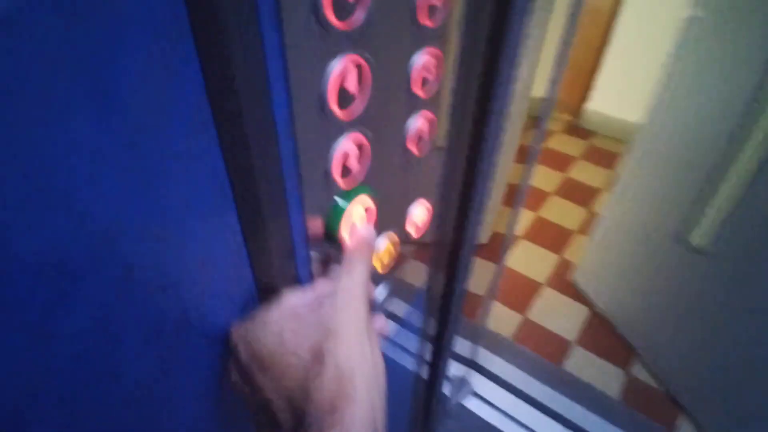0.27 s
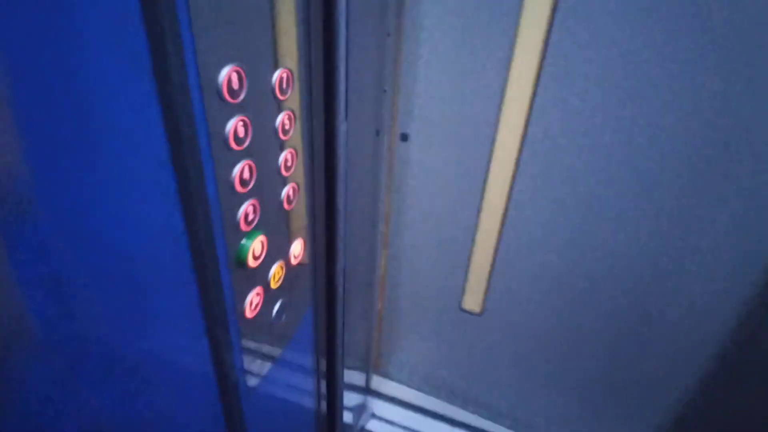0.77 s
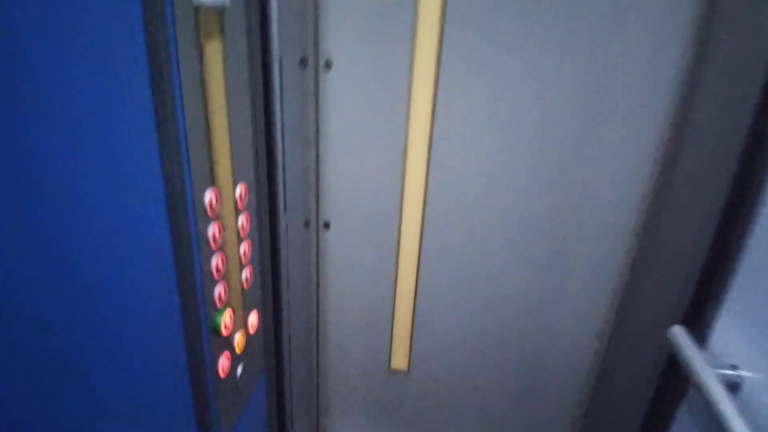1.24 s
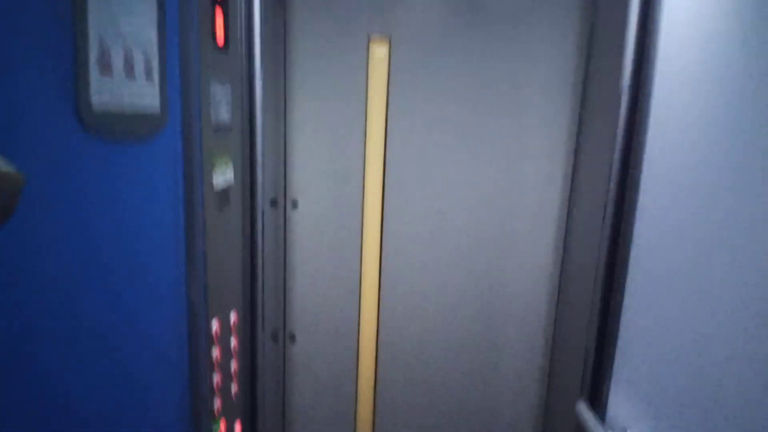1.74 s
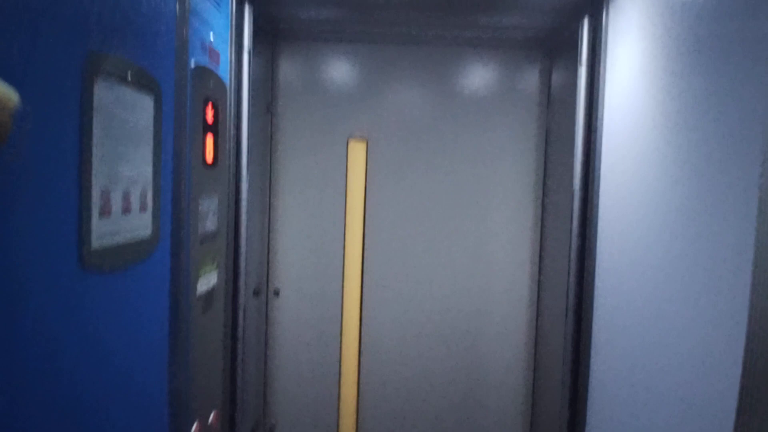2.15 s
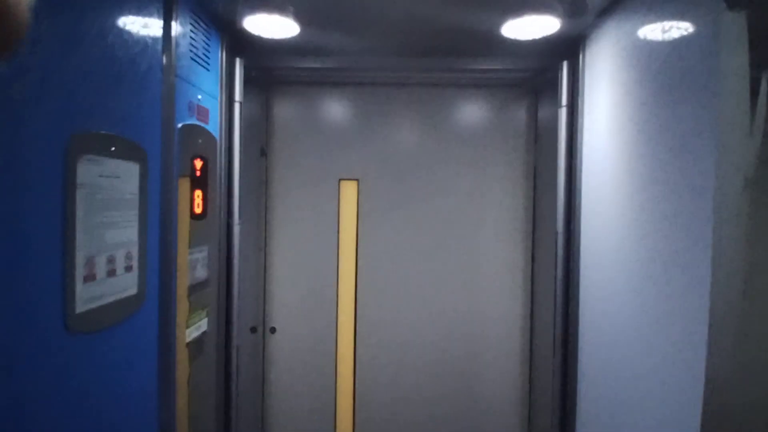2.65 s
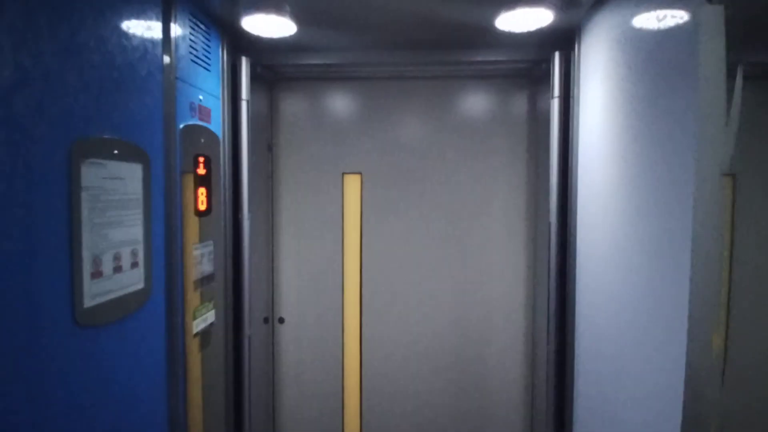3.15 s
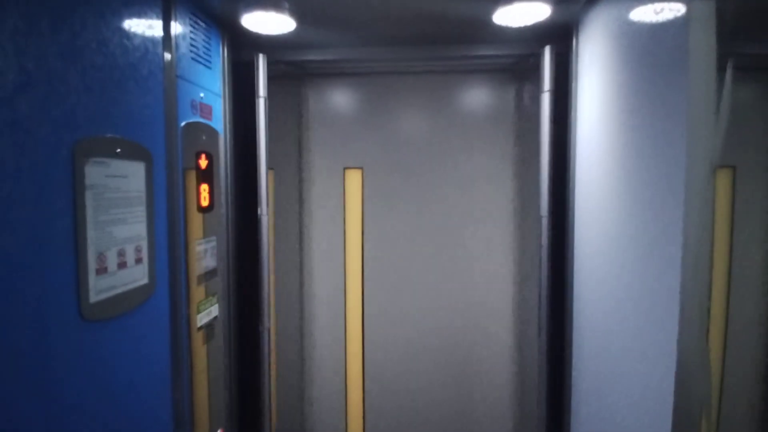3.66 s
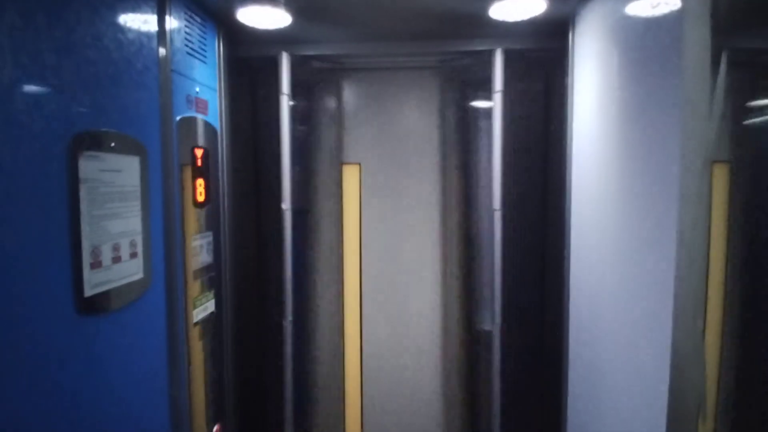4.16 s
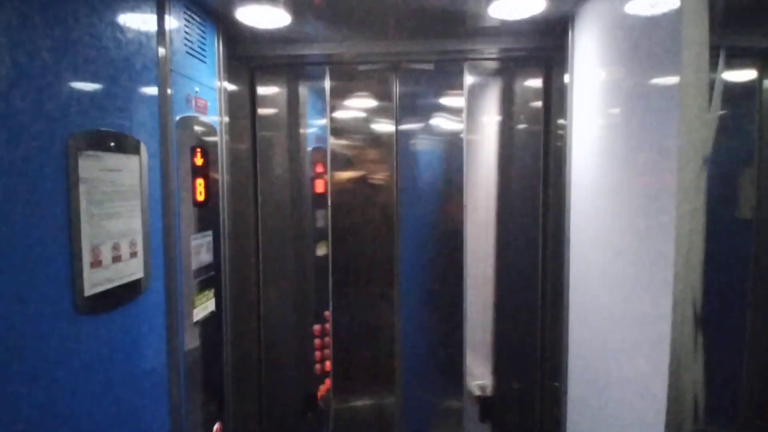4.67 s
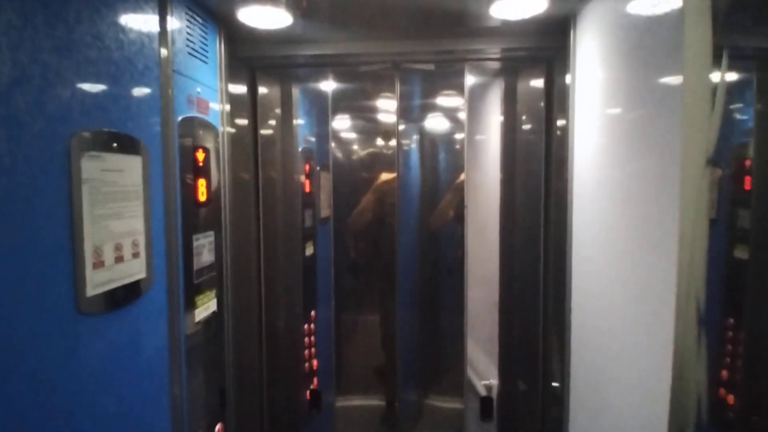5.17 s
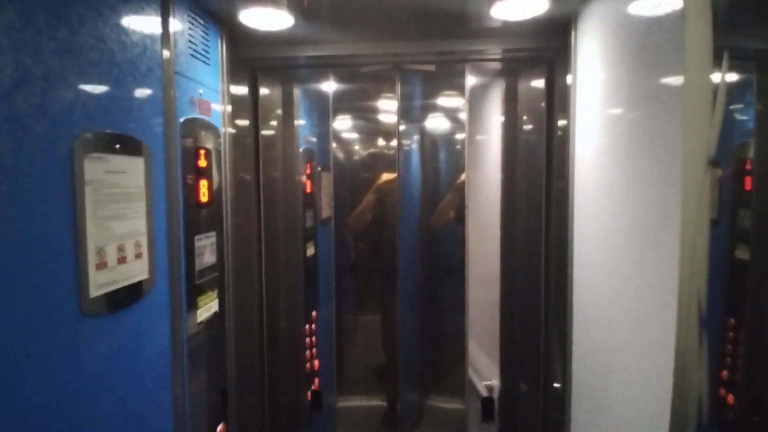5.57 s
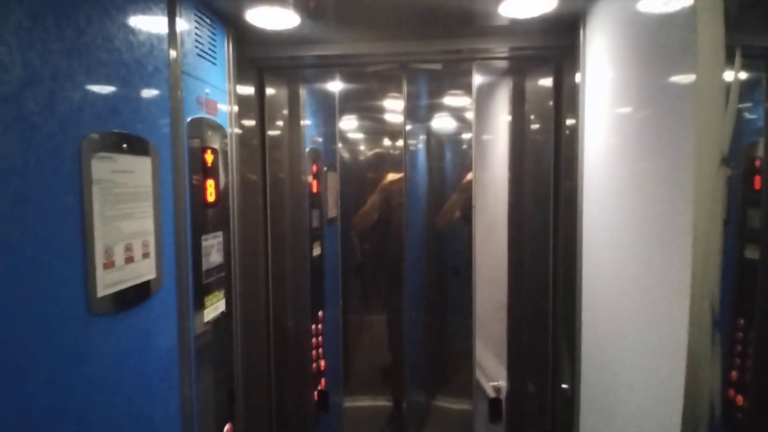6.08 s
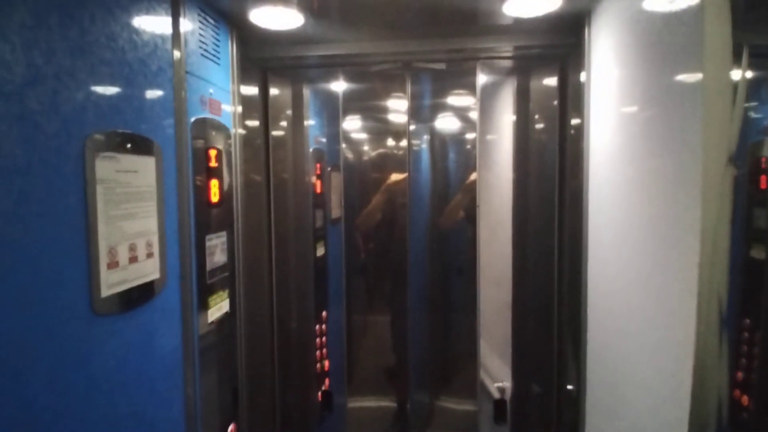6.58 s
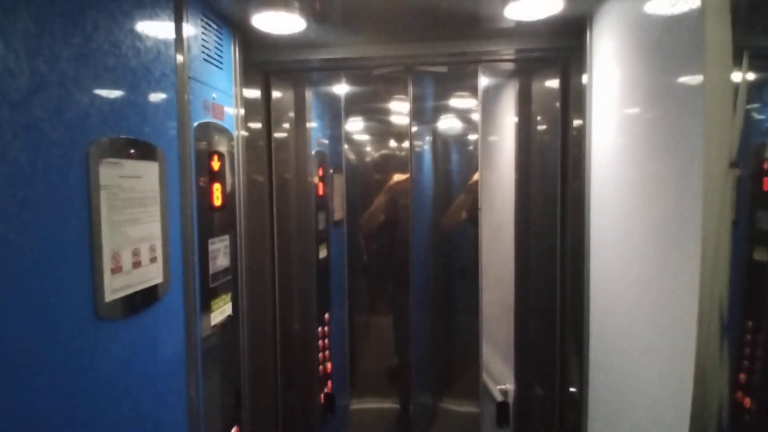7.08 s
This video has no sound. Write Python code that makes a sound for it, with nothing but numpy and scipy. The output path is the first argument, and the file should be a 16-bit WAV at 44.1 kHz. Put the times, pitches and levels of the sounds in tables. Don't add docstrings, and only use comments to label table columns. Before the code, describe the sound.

Heard from inside a cramped metal lift car: faint button and hand noises, then a heavy hinged door slams with a boom, bounces, rattles and squeaks briefly. After a lull a latch clicks, folding doors rumble and clatter shut, and small clicks and scrapes follow. Finally a relay snaps, the car thuds and a low hum begins. Close handheld stereo pickup with tight metallic reflections.

```python
import sys
import numpy as np
from scipy import signal
from scipy.fft import rfft, irfft, next_fast_len
from scipy.io import wavfile
from scipy.ndimage import uniform_filter1d

SR = 44100
rng = np.random.default_rng(int(sys.argv[2]) if len(sys.argv) > 2 else 0)


def undo_db(level):
    steps = np.asarray(level, float) / 20
    return 10 ** steps


def int16_out(signal):
    q = np.round(np.clip(np.atleast_2d(signal).T, -1, 1) * 32767)
    wavfile.write(sys.argv[1], SR, q.astype(np.int16))


N = 322941
TIME = np.arange(N) / SR
COARSE = TIME[::SR // 1000]

# frequency in Hz, width in Hz, level in dB.
SWAY_MODES = [(33.7, 16.3, 3.5), (54, 16, 3.5)]
FRAME_MODES = [(81.5, 7.6, -4), (99.3, 7.2, -1), (109.6, 4.8, -0.5), (145.6, 16.8, -2.5)]
PANEL_MODES = [(185, 19, 6), (211, 16, -13.5), (235.8, 7.1, -4), (262, 15, 2.5), (307, 70, 2.5)]
SHEET_MODES = [(365.8, 21.7, 4.5), (431.2, 22.6, 2), (501, 72, 2), (650, 71, -2), (712.7, 28, -1.5),
               (801, 52, 0), (907, 135, -1.5), (1124, 360, -2.5)]
# start in seconds, level in dB, place (0 car, 1 frame, 2 panels,
# 3 sheets), hold in seconds, T60 in seconds.
LANDING_DOOR = [(0.17, -40, 0.54, .02, 0.36), (0.366, -32, 2.26, .02, 0.81), (.37, -39.5, 0.11, .1, 1.1),
                (.829, -16.5, 2.8, 0.072, 0.83), (.83, -32, 1.4, .06, .3), (0.854, -16, .05, .03, 0.4),
                (0.915, -16.5, 2.18, 0.058, 1.5), (1.027, -16, 2.3, 0.18, 1.5),
                (1.068, -13, 0.038, 0.063, 0.87), (1.278, -19.5, 2.38, 0.067, 1.43),
                (1.348, -15, .05, 0.039, 0.7), (1.583, -13, 0.29, 0.062, 1.35),
                (1.652, -25.5, 2.35, 0.055, 1.2), (1.918, -24.5, 0.27, 0.033, 2.5),
                (2.188, -36.5, 2.47, 0.053, 1.6), (.01, -49, 2, 0.24, 0.54)]
CAR_DOORS = [(2.5, -39, -0.44, 0.6, .6), (2.615, -36, 2.5, 0.043, .5), (2.81, -44, 0, 0.043, .3),
             (2.859, -27, 0.93, .05, 1.2), (2.87, -31, 3.1, 0.027, 0.42), (3.189, -18.5, 1.32, .06, 0.56),
             (3.2, -30.5, 2.7, 0.18, 1.4), (3.4, -19.5, 0.76, 1.35, .5), (3.41, -33, 2, 1.2, 0.24),
             (3.52, -19.5, 0.95, 0.12, 0.8), (3.7, -29, 1.5, 0.058, 0.3), (3.88, -27, 2.17, 0.061, 0.84),
             (3.96, -24, -1, 0.045, 0.34), (4.24, -19, 2.4, 0.036, 0.43), (4.478, -20, 2.5, 0.028, 0.43),
             (4.56, -17, 1.2, 0.066, 0.37), (3.07, -30, 1.56, 0.14, .3), (4.12, -22.5, 2.5, 0.068, 0.82),
             (4.719, -23, 2, 0.065, 0.61), (4.96, -24, 2, 0.085, 0.24), (5.0, -30, 0.3, 0.24, 1.2),
             (3.71, -34, 3, .72, .3)]
DRIVE = [(5.372, -28, 2.1, 0.022, 0.61), (5.5, -41.5, 2.66, .25, .6), (6.8, -39, 1.5, 0.068, .4),
         (5.9, -54.5, .05, .1, .5), (6.2, -47, 0.06, 0.11, 1.1), (6.349, -29.5, 1.25, 0.026, 1.3),
         (6.67, -28, 0.26, 0.083, 1.45), (6.8, -25, 0.063, .55, .5), (6.9, -30, 2.26, 0.034, 0.18),
         (6.93, -36, 2, 0.011, 0.39), (6.97, -16, 0.63, 0.017, 0.44), (7.0, -35.5, 2.45, .4, .5)]
# start in seconds, level in dB, hold and T60 in seconds.
MOTORS = [
    (4.747, -30.5, .8, 1.3),
    (5.904, -45.5, .25, .5),
    (6.906, -25, .45, .5),
]
REST_DB = [-48, -66, -56, -56.5]
SHOVE_RISE_S = [0.027, 0.012, 0.014, 0.0038]
LOSS_DB_PER_PART = 11.5
PANEL_QUIET_HZ, PANEL_HZ_PER_DB = 179, 2.5

# time in seconds, frequency
# in Hz, level in dB.
BOOM = [(.824, 204.5, -49), (0.833, 205.5, -9), (0.871, 212.8, -14), (0.902, 227, -8.5), (.96, 253.7, -11),
        (1.015, 262, -13), (1.04, 262, -28)]
# time in seconds, level in dB.
BOUNCES = [(.834, 2), (0.844, 0), (.864, -3), (.889, 4), (.92, 2), (.939, 1), (0.965, 1.5), (0.979, -1),
           (1.001, 0), (1.016, -6), (1.033, -7)]
BOUNCE_S, BETWEEN_DB = 0.0065, -14

# frequency in Hz, level in dB, T60 in seconds.
SLAM_MODES = [(136.5, -3.5, 0.43), (872, -6.5, 0.051)]
STRIKE_MODES = [(1770, -5, 0.22), (1920, -4, .25), (2060, -3, 0.29), (2260, -1, .2)]
LATCH_MODES = [(833, 1, 0.36), (890, 7.5, 0.3), (1477, -7, 0.3), (2110, -3, 0.24), (2375, -2, 0.2),
               (3110, -4, 0.07), (3285, 3, 0.14), (3690, -4, .1)]
RELAY_MODES = [(1600, 1, 0.012), (2500, 4, 0.011), (3550, 8, 0.011), (4280, 1, .01), (1560, -20, 0.2),
               (2430, -24, .15), (3550, -22, .15), (4300, -19, 0.17)]
# start in seconds, level in dB, frequency in Hz, T60 in seconds.
BUMPS = [(1.068, -14, 646, 0.2), (1.1, -13, 595, 0.23), (1.075, -17.5, 699, 0.26), (1.125, -14, 640, 0.14),
         (1.638, -19.5, 741, 0.13), (1.59, -11.5, 32, 0.65), (1.693, -1, 40.2, 0.17),
         (2.883, -20.5, 139, 0.43), (3.209, -7, 650, 0.07), (3.238, -13, 215, 0.097),
         (3.96, -19, 317, 0.04), (3.955, -21, 750, .1), (3.975, -24, 604, 0.12), (3.968, -13, 67, 0.2),
         (4.15, -21, 371, 0.21), (4.288, -12, 314, 0.11), (4.508, -7, 313, 0.08), (4.749, -11, 254, 0.055),
         (4.943, -12.5, 98, 0.5), (4.9634, -16, 98, .2), (5.371, -16.5, 308, 0.16),
         (5.372, -23.5, 403, 0.15), (5.431, -21, 284, 0.16), (5.432, -25, 393, .15), (.955, -12, 205, 0.5),
         (1.165, -15.5, 150, 0.34), (2.9334, -18, 140, 0.12), (6.37, -20, 119, 0.26),
         (6.83, -30.5, 200, 0.47), (6.974, -4, 103.5, 0.2), (6.975, -17, 54, .3)]
TICKS = [(.4504, -34, 2120, 0.055), (5.418, -41, 4550, 0.024), (5.449, -38, 4470, 0.023),
         (6.625, -36, 5200, 0.019), (6.625, -39, 3600, .02), (6.643, -40, 8400, .02),
         (6.663, -37, 2580, 0.034)]

# start in seconds, crack level in dB, crack centre in Hz, T60 in seconds.
SLAMS = [
    (.8285, -14.5, 2930, 0.23),
    (.8612, -19, 2930, 0.32),
    (.8834, -11.5, 2750, 0.19),
]
TAPS = [(.1715, -37, 1790, 0.1), (.4504, -35.5, 2120, 0.44), (1.5843, -35, 4300, 0.36),
        (3.3957, -24, 2600, 0.25), (3.3965, -23, 1410, 0.23), (3.468, -21, 1620, 0.27),
        (3.4685, -23, 2670, 0.22), (3.7247, -37, 3660, 0.63), (1.0273, -26.5, 2300, 0.61),
        (2.968, -39, 2500, 0.16), (3.073, -44.5, 2500, .4), (3.2138, -19, 1300, 0.18),
        (4.1502, -26, 1040, 0.14), (4.8495, -27, 1150, 0.11), (4.9317, -14, 2150, 0.37),
        (6.6623, -37.5, 2418, 0.23), (6.78, -47, 3550, 0.88)]
CLANKS = [(.37, -34.5, 1510, 0.19), (3.1944, -22.5, 1680, 0.53), (3.955, -33, 1110, 0.6),
          (4.15, -32, 3760, 0.22), (4.2729, -29, 3550, 0.35), (4.4714, -30, 1120, 0.72),
          (4.849, -28.5, 1610, 0.18), (5.372, -39.5, 1420, 0.41)]
SNAPS = [(.6988, -33, 2240, 1), (1.0544, -20.5, 4300, 0.16), (1.0657, -16.5, 2200, 0.29),
         (1.1494, -20.5, 2160, 0.24), (2.612, -23, 2980, 0.33), (2.807, -22, 1730, 0.39),
         (4.5027, -23.5, 1940, 0.4), (4.6967, -29.5, 3600, 0.78), (4.901, -21.5, 3380, 0.24),
         (4.909, -17, 3500, 0.28), (5.4969, -36, 2350, 1), (6.2587, -40, 3450, 1), (6.889, -37, 1800, 0.47)]
CRASHES = [(1.308, -18, 2060, 0.25), (1.668, -30, 2100, .6), (1.745, -26, 2300, 0.45),
           (3.129, -34.5, 2400, 0.79), (3.1385, -27, 6700, 0.33), (3.2081, -18.5, 3240, 0.19),
           (5.074, -21, 3550, .25), (6.9094, -31, 1730, 0.39)]
# start in seconds, level in dB, frequency in Hz, width
# in Hz, T60 in seconds.
PLATES = [(1.584, -34, 4300, 400, .25), (2.614, -31, 3320, 150, .3), (2.615, -30, 6500, 4000, .3),
          (2.616, -30, 2250, 400, .3), (2.616, -33, 4300, 500, .25), (2.65, -34, 2900, 500, .25),
          (2.808, -31, 1900, 400, .35), (2.808, -31, 1030, 150, .2), (2.81, -33, 6600, 800, .25),
          (2.81, -35, 4330, 300, .4), (3.6, -25, 265, 30, .5), (3.655, -25, 265, 30, .4),
          (3.721, -28, 520, 150, .2), (3.759, -25, 366, 60, .15), (3.787, -28, 441, 60, .12),
          (3.875, -25, 262, 30, .5), (4.152, -28, 880, 200, .3), (4.169, -24, 400, 100, .2),
          (4.24, -24, 366, 80, .2), (4.272, -29, 1120, 200, .25), (4.474, -24, 820, 120, .2),
          (4.478, -24, 509, 100, .2), (4.503, -27, 1080, 150, .15), (4.848, -27, 851, 150, .2),
          (4.97, -23, 304, 60, .25), (5.082, -30, 361, 80, .2), (5.49, -40, 2100, 120, .5),
          (6.783, -42, 4310, 200, .4), (6.795, -44, 2420, 250, .3), (6.836, -45, 1560, 150, .4),
          (6.975, -22, 200, 50, .15), (2.856, -29, 600, 500, .25), (6.864, -41, 2900, 300, .05)]
PLATE_RISE_S = 0.003

# time in seconds, slip rate in Hz, level in dB.
SQUEAK = [(1.34, 608, -29), (1.375, 651, -20.5), (1.399, 658, -13), (1.44, 676.4, -21.5),
          (1.485, 670, -22.5), (1.52, 660, -65)]
# multiple of the slip rate, level in dB.
SQUEAK_ORDERS = [(1, 3.5), (2, -11.5), (3, -4), (4, -11), (5, -13.5), (6, -26), (7, -25), (8, -23)]
# time in seconds, level in dB.
GRIPS = [(1.36, -3), (1.384, -3), (1.405, -3), (1.432, 3), (1.475, 1.5)]
GRIP_S, LOOSE_DB = 0.009, -11.5

# frequency in Hz, width in Hz, level in dB.
LEAF = [(0.44, -70), (0.526, -39), (0.7, -52)]
LEAF_MODES = [(2800, 210, -7), (4150, 410, 1)]
RATTLE = [(.862, -70), (.872, -38), (.92, -34), (.97, -58)]
RATTLE_MODES = [(12400, 900, 0), (15000, 1200, -2)]
ROLLERS = [(3.38, -60), (3.45, -34), (3.7, -28), (3.82, -31), (3.92, -33), (4.1, -31.5), (4.3, -29.5),
           (4.75, -31), (5.1, -48)]
ROLLER_MODES = [(262, 6.7, -1), (366.5, 6, -4.5), (440, 9.7, -6.5), (505, 16, -7.5)]
ROLL = [(3.68, -51.5), (3.692, -57), (3.732, -39.5), (4.37, -39), (4.432, -53), (4.46, -50)]
ROLL_MODES = [(3790, 810, -4.5), (5600, 520, -16)]
CAM = [(5.478, -72), (5.49, -40.5), (5.55, -34.5), (5.7, -40), (5.85, -50), (6.15, -64)]
CAM_MODES = [(1510, 200, -12), (2080, 130, -12), (2325, 85, -1), (3700, 600, -6.5), (5100, 1800, -14)]
BRAKE = [(6.36, -51), (6.392, -39.5), (6.458, -36.5), (6.67, -53), (6.85, -49)]
BRAKE_MODES = [(3850, 65, 1.8), (4100, 190, -0.8)]
RAIL = [(6.98, -67), (7.01, -50), (7.212, -37), (7.32, -41.5)]
RAIL_MODES = [(1420, 350, -5), (2700, 690, -2.5)]
ROPE = [(7.0, -70), (7.04, -45), (7.12, -50), (7.32, -50)]
ROPE_MODES = [(8200, 270, 0), (7600, 400, -5)]

# time in seconds, level in dB.
SLIDE = [(0.0, -51), (.73, -50), (.95, -32), (1.4, -32), (1.61, -41), (1.91, -52), (2.77, -53),
         (2.93, -50.5), (3.53, -54.5), (3.77, -39), (4.18, -38), (4.52, -44), (4.95, -34), (5.16, -43),
         (5.44, -79), (5.63, -43.5), (5.93, -96), (6.3, -47)]
SLIDE_RUNNING_DB = -52
# start in seconds, level in dB, hold and T60 in seconds.
SEALS = [(0, -47, 0.13, 0.86), (0.35, -46.5, 2.3, 0.76), (2.967, -53.5, .15, .5), (3.128, -48.5, 1.8, 1.2),
         (.86, -47, .05, 0.18), (.5, -43, 0.15, 0.53), (0.705, -33, 0.083, 0.38), (1.008, -45, 0.2, 0.63),
         (1.341, -35.5, 0.1, 0.34), (3.85, -45, 0.49, 1.1), (4.904, -29, 0.067, 0.27),
         (5.5, -61, 0.16, 3.6), (6.4, -56, 0.43, .5), (6.861, -38, 0.073, .2), (2.797, -32.5, 0.037, 0.23),
         (6.843, -49, .5, 0.44), (1.715, -35.5, .065, .3)]
SEAL_RISE_S = 0.022
# frequency in Hz, level in dB per Hz.
SCRAPE = [(700, -1.5), (1100, -2), (2000, -0.5), (3200, -9.5), (5000, -43)]
HISS = [(2200, -4.5), (3400, -1.5), (4500, -0.5), (7500, -7), (16000, -22)]
AIR = [(300, -14), (545, 7.5), (900, -13), (1600, -7.5), (2400, -16.5), (3200, -22), (5800, -15),
       (7500, -0.5), (10500, -20.5), (14300, -5.5)]
AIR_DB = -44.5
LAMP_HZ, LAMP_WIDTH_HZ, LAMP_DB = 1620, 5.4, -64

# frequency in Hz, level in dB.
WALLS = [(60, -11), (110, -20), (200, -9), (380, -5), (700, -8), (1290, -2), (2380, -6.5), (4400, -8.5),
         (8120, -3.5), (15000, -2)]
CABIN_T60_S, CABIN_DB, WALL_T60_S = 0.079, -7, 0.23
# frequency in Hz, level in dB.
MIC = [(8000, 0), (9500, -6.5), (11500, -6.5), (14200, -0.5), (15800, -3.5), (16000, -44)]


def unit(x):
    return x / np.sqrt(np.mean(x ** 2))


def colour(x, points):
    hz, db = np.transpose(points)
    size = next_fast_len(len(x))
    log_hz = np.log(np.arange(size // 2 + 1) * SR / size + 1)
    return irfft(rfft(x, size) * undo_db(np.interp(log_hz, np.log(hz), db)), size)[:len(x)]


def ring(x, hz, width_hz):
    return signal.lfilter(*signal.iirpeak(hz, hz / width_hz, fs=SR), x)


def ring_twice(x, hz, width_hz):
    return ring(ring(x, hz, width_hz), hz, width_hz)


def modes_of(x, modes):
    return [(-1) ** k * undo_db(db) * unit(ring_twice(x, hz, 1.57 * width_hz))
            for k, (hz, width_hz, db) in enumerate(modes)]


def body(x, modes):
    return unit(sum(modes_of(x, modes)))


def jolts(rate_hz, spread_db):
    hit = rng.random(N) < rate_hz / SR
    return hit * rng.standard_normal(N) * undo_db(spread_db * np.minimum(rng.exponential(size=N), 4))


def steady(x, span_s):
    span = int(span_s * SR)
    power = uniform_filter1d(uniform_filter1d(x ** 2, span), span)
    return unit(x / np.sqrt(power + 0.65))


def gain(s, db):
    return undo_db(np.interp(TIME, s, db, left=-120, right=-120))


def decay(t, t60_s):
    return np.exp(-np.log(1000) * t / t60_s)


def pulses(events, width_s):
    return sum(undo_db(db) * np.exp(-((TIME - s) / width_s) ** 2) for s, db in events)


def swell(s, db, hold_s, t60_s, rise_s):
    t = np.maximum(COARSE - s, 0)
    fall_db = 60 * np.maximum(t - hold_s, 0) / t60_s
    return (undo_db(db - fall_db) * np.minimum(t / rise_s, 1)) ** 2


def together(powers):
    return np.interp(TIME, COARSE, np.sqrt(sum(powers)))


def add(out, s, x):
    i = int(s * SR)
    out[i:i + len(x)] += x[:N - i]


def shaking(part):
    pushes = [(s, db - LOSS_DB_PER_PART * abs(where - part), hold_s, t60_s)
              for s, db, where, hold_s, t60_s in LANDING_DOOR + CAR_DOORS + DRIVE]
    if part == 1:
        pushes = pushes + MOTORS
    return together([undo_db(REST_DB[part]) ** 2] + [swell(*push, SHOVE_RISE_S[part]) for push in pushes])


def structure():
    sway, frame, panel, sheet = map(shaking, range(len(REST_DB)))
    out = sway * steady(body(jolts(300, 2.4), SWAY_MODES), 0.34)
    out += frame * steady(body(jolts(300, 2.34), FRAME_MODES), 0.11)
    favoured_hz = PANEL_QUIET_HZ + PANEL_HZ_PER_DB * (20 * np.log10(panel) - REST_DB[2])
    nearness = [np.exp(-(np.log(hz / favoured_hz) / 0.29) ** 2) + 0.81 for hz, _, _ in PANEL_MODES]
    panels = sum(n * mode for n, mode in zip(nearness, modes_of(jolts(400, 3.6), PANEL_MODES)))
    out += panel * steady(unit(panels), 0.075)
    return out + sheet * steady(body(jolts(1200, 1.84), SHEET_MODES), 0.11)


def boom():
    s, hz, db = np.transpose(BOOM)
    bounce = undo_db(BETWEEN_DB) + pulses(BOUNCES, BOUNCE_S)
    phase = 2 * np.pi * np.cumsum(np.interp(TIME, s, hz)) / SR
    return np.sin(phase) * bounce * gain(s, db + 4.0)


def struck():
    out, t = np.zeros(N), TIME[:SR]
    blows = [(0.827, -1.5, SLAM_MODES, 0.001), (0.8831, -18.5, STRIKE_MODES, 0.002),
             (2.608, -26.5, LATCH_MODES, 0.004), (6.7798, -18, RELAY_MODES, 0.0003)]
    blows += [(s, db, [(hz, 0, t60_s)], 0.12 / hz) for s, db, hz, t60_s in BUMPS + TICKS]
    for s, db, modes, push_s in blows:
        rings = sum((-1) ** k * undo_db(mode_db) * np.sin(2 * np.pi * hz * t) * decay(t, t60_s)
                    for k, (hz, mode_db, t60_s) in enumerate(modes))
        add(out, s, undo_db(db) * rings * (1 - np.exp(-t / push_s)))
    return out


def chatter(rows, clank_db, spit_db, loss_db_per_octave, rise_s):
    out, t = np.zeros(N), TIME[:SR // 3]
    for s, db, centre_hz, t60_s in rows:
        crack_noise, clank_noise, spit_noise = rng.standard_normal((3, len(t)))
        parts = []
        for ratio in (0.72, 1.0, 1.3, 1.65, 2.1):
            part = ring_twice(np.roll(crack_noise, int(999 * ratio)), centre_hz * ratio, 0.38 * centre_hz)
            parts.append(part * undo_db(-loss_db_per_octave * np.log2(ratio)))
        crack = unit(sum(parts) + 1.14 * parts[1])
        clank = 0.79 * undo_db(clank_db) * body(clank_noise, SHEET_MODES)
        spit = unit(colour(spit_noise, [(3000, -5.5), (5500, 0.0), (16000, -13.5)]))
        spit *= 1.2 * undo_db(spit_db) * (1 - np.exp(-t / 0.0012))
        fade = decay(t, t60_s) * (1 - np.exp(-t / rise_s))
        add(out, s, undo_db(db - 4.5) * fade * (crack + clank + spit))
    return out


def knocks():
    out = chatter(SLAMS, clank_db=-0.57, spit_db=-17, loss_db_per_octave=78, rise_s=0.00044)
    out += chatter(TAPS, clank_db=-4.5, spit_db=-35, loss_db_per_octave=4.7, rise_s=0.0003)
    out += chatter(CLANKS, clank_db=10.4, spit_db=-17, loss_db_per_octave=5, rise_s=0.00051)
    out += chatter(SNAPS, clank_db=-7, spit_db=-4.5, loss_db_per_octave=8.7, rise_s=0.00096)
    return out + chatter(CRASHES, clank_db=2.8, spit_db=-6.5, loss_db_per_octave=4.3, rise_s=0.0028)


def plates():
    out, t = np.zeros(N), TIME[:SR // 3]
    for s, db, hz, width_hz, t60_s in PLATES:
        noise = rng.standard_normal(len(t))
        buzz = steady(unit(ring_twice(noise, hz, 1.57 * width_hz)), 2 / width_hz)
        add(out, s, undo_db(db) * buzz * decay(t, t60_s) * (1 - np.exp(-t / PLATE_RISE_S)))
    return out


def squeak():
    s, hz, db = np.transpose(SQUEAK)
    wobble = unit(uniform_filter1d(rng.standard_normal(N), 150))
    phase = 2 * np.pi * np.cumsum(np.interp(TIME, s, hz) * (1 + 0.016 * wobble)) / SR
    after_s = np.maximum(TIME - 1.41, 0)
    tone = sum(undo_db(order_db - SQUEAK_ORDERS[0][1] - 45 * (k - 1) * after_s) * np.sin(k * phase + k * k)
               for k, order_db in SQUEAK_ORDERS)
    throb = undo_db(LOOSE_DB) + 1.05 * pulses(GRIPS, GRIP_S)
    return np.sqrt(2) * tone * throb * gain(s, db)


def guides():
    pairs = [(LEAF, LEAF_MODES), (RATTLE, RATTLE_MODES), (ROLLERS, ROLLER_MODES), (ROLL, ROLL_MODES),
             (CAM, CAM_MODES), (BRAKE, BRAKE_MODES), (RAIL, RAIL_MODES), (ROPE, ROPE_MODES)]
    return sum(gain(*np.transpose(curve)) * body(jolts(5000, 0.92), modes) for curve, modes in pairs)


def sliding():
    pressure = gain(*np.transpose(SLIDE)) + undo_db(SLIDE_RUNNING_DB) * (TIME > SLIDE[-1][0])
    leak = together(swell(*seal, SEAL_RISE_S) for seal in SEALS)
    scrape = pressure * unit(colour(jolts(6000, 2.8), SCRAPE))
    return scrape + leak * unit(colour(jolts(9000, 0.78), HISS))


def lamp():
    return undo_db(LAMP_DB) * unit(ring(rng.standard_normal(N), LAMP_HZ, LAMP_WIDTH_HZ))


def air():
    return undo_db(AIR_DB) * unit(colour(rng.standard_normal(N), AIR))


def tail(t60_s):
    t = TIME[:SR // 3]
    noise = rng.standard_normal(len(t)) * decay(t, t60_s) * (t > 0.002)
    return noise / np.sqrt(np.sum(noise ** 2))


def cabin(direct):
    echo = signal.fftconvolve(direct, tail(CABIN_T60_S))[:N]
    mid = direct + undo_db(CABIN_DB) * colour(echo, [(200, -28), (600, 0), (9000, -4.0)])
    wall_echo = signal.fftconvolve(direct, tail(WALL_T60_S))[:N]
    high = colour(wall_echo, [(150, -12.0), (500, 0.0), (900, 2.0)])
    size, t = next_fast_len(N), TIME[:SR // 30]
    shift = unit(rfft(rng.standard_normal(len(t)) * np.exp(-t / 0.0069), size).real)
    shifted = irfft(1j * np.tanh(2 * shift) * rfft(mid, size), size)[:N]
    low = colour(shifted, [(30, -13), (100, -8), (700, -8), (1300, -4)])
    return mid, low + high


def scene():
    direct = structure() + boom() + struck() + knocks() + plates() + squeak()
    direct = direct + guides() + sliding() + lamp()
    mid, side = cabin(direct)
    mid, side = mid + air(), colour(side + air(), WALLS)
    return np.array([mid + side, mid - side])


def band_limit(x):
    return signal.sosfilt(signal.butter(12, 15920, fs=SR, output="sos"), x)


def record(dry):
    heard = np.array([colour(channel, MIC) for channel in dry])
    return band_limit(np.tanh(0.78 * heard) / 0.86)


dry = scene()
out = record(dry)
int16_out(out)
```